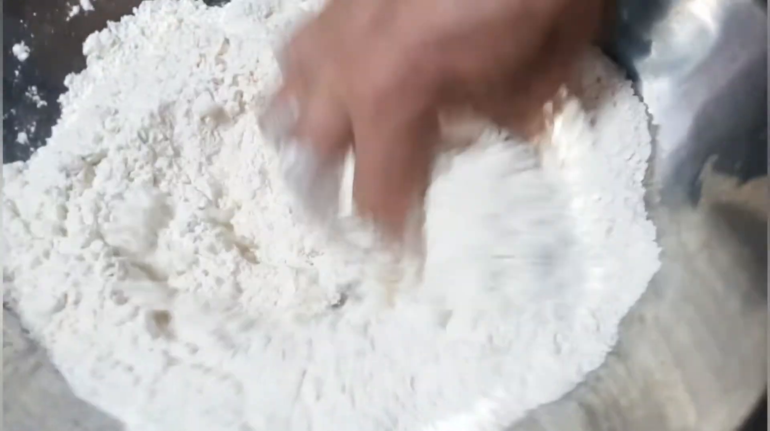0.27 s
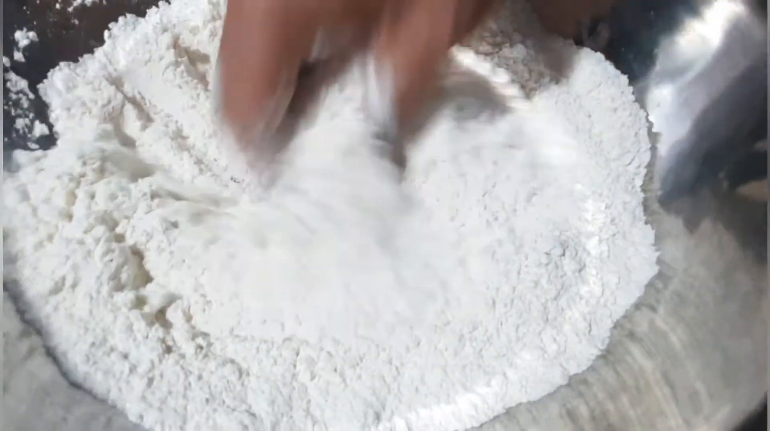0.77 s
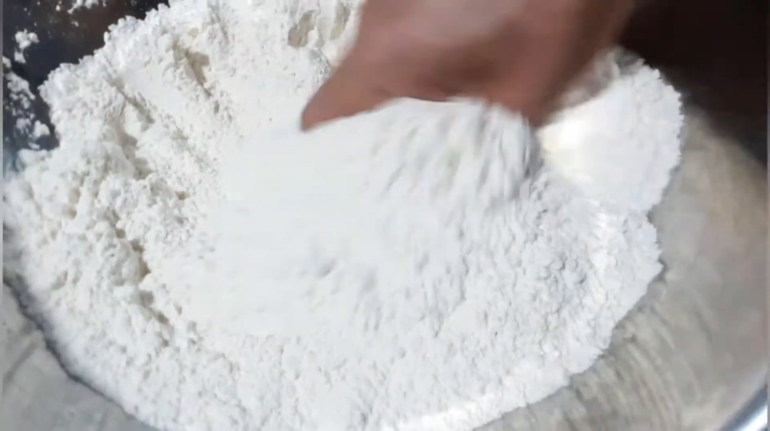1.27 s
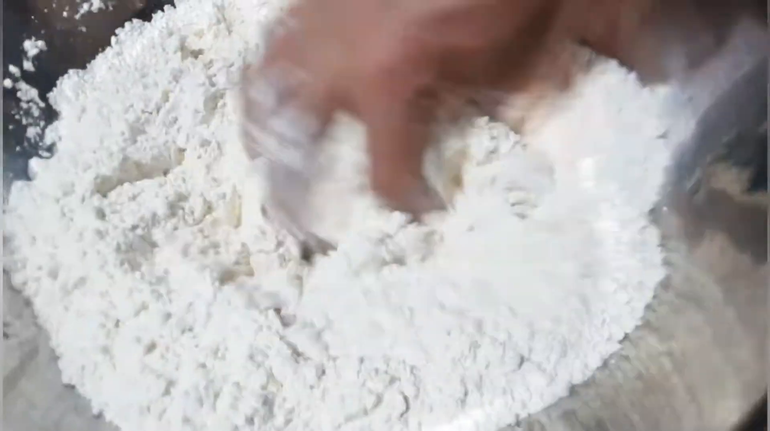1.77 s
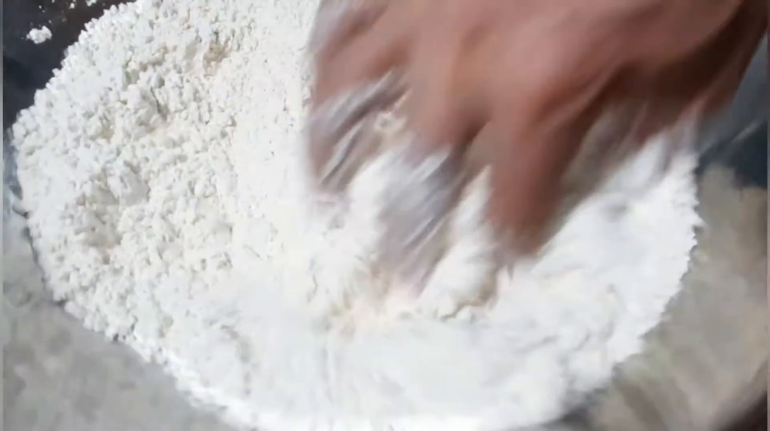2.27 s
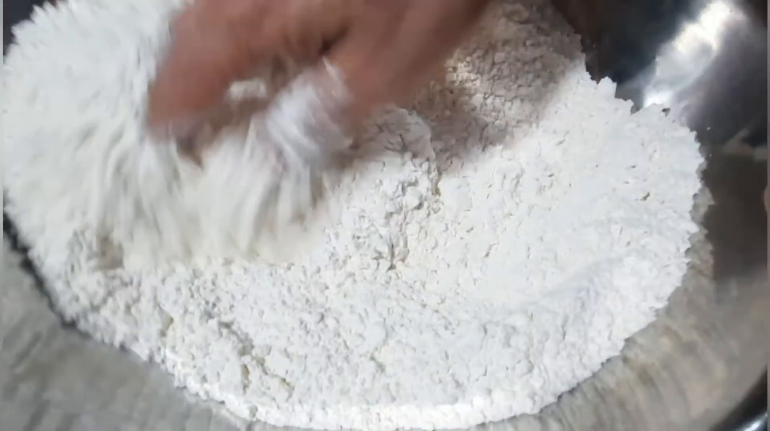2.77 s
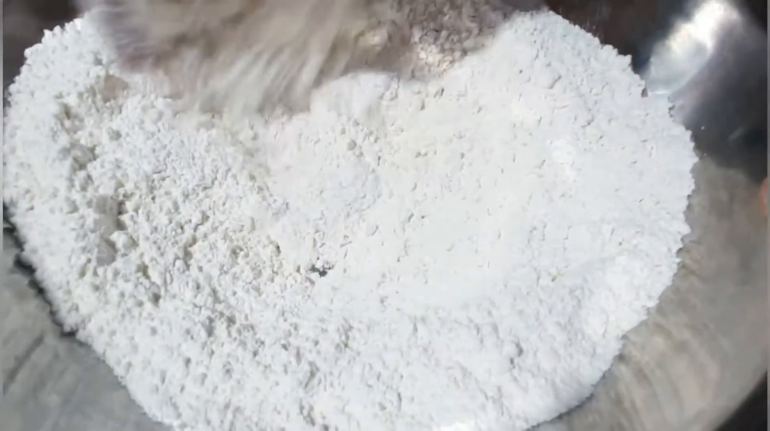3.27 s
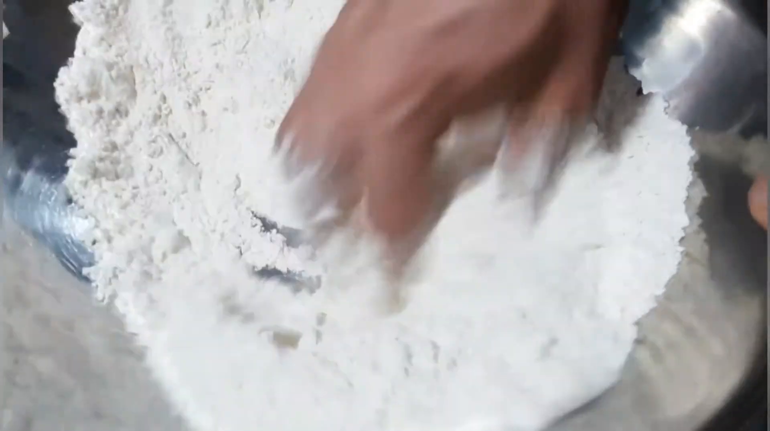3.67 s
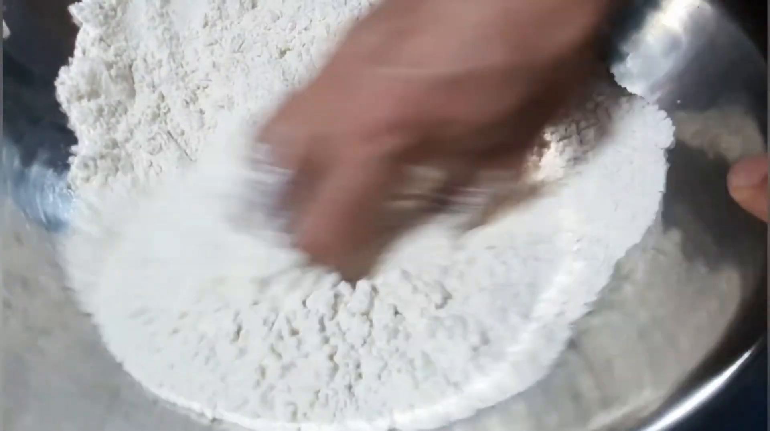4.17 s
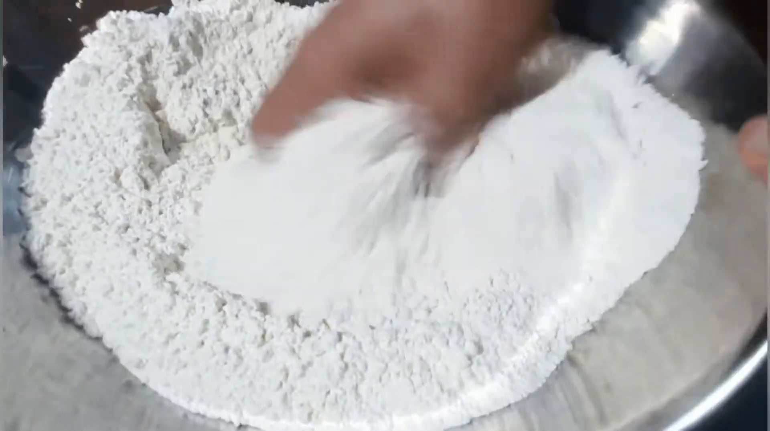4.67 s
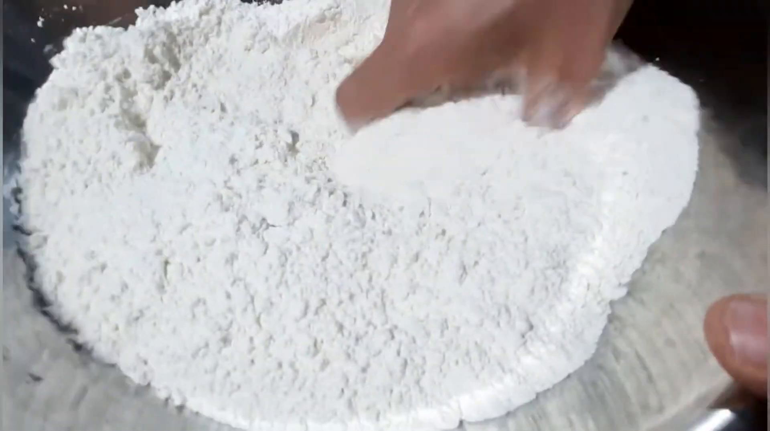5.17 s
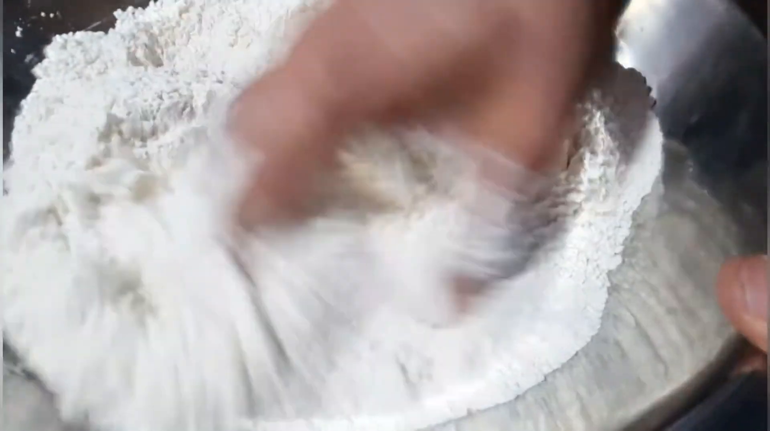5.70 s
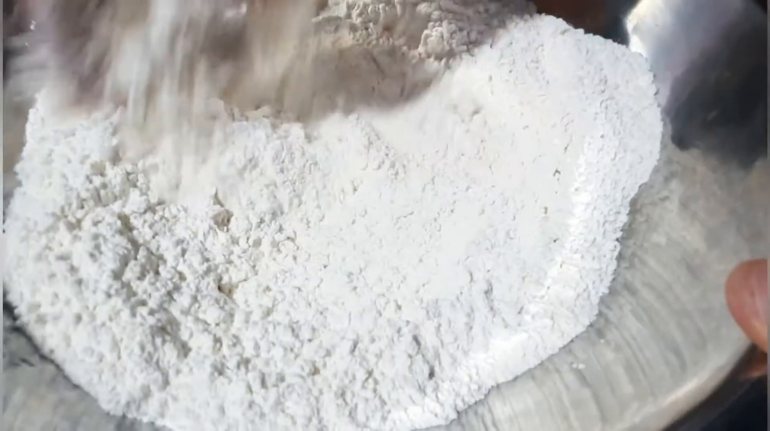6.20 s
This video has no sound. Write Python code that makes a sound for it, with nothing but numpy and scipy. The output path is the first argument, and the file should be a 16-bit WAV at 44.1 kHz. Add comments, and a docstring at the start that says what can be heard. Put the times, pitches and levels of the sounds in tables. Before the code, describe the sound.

A hand stirs dry flour in a steel bowl, with soft powdery hissing, rubbing and light thuds over a faint kitchen hum.

```python
"""Flour stirred in a steel bowl

A hand stirs dry flour close to the microphone. The shearing powder hisses, the fingers rub
the steel in stick-slip friction and tick against it, and handfuls drop back with soft thuds
that rock the bowl and ring its base. An appliance hums and hisses in the quiet kitchen behind."""
import sys
import numpy as np
from scipy import signal
from scipy.fft import rfft, irfft, next_fast_len
from scipy.io import wavfile

SR = 44100
rng = np.random.default_rng(int(sys.argv[2]) if len(sys.argv) > 2 else 0)


def store_wav(level_fs):
    """Save 16-bit WAV to argv[1]."""
    pcm = np.round(np.clip(np.atleast_2d(level_fs), -1, 1) * 32767)
    wavfile.write(sys.argv[1], SR, pcm.T.astype(np.int16))


N = 283959
T = np.arange(N) / SR

# spectrum of shearing powder: f/Hz, level/dB
POWDER_SPECTRUM = [(1500, -15), (3500, -38), (4500, -19.5), (5600, 3.5), (7000, -0.5), (8200, -1),
                   (9300, -10.5), (11500, -4.5), (13500, -4.5), (16000, -6)]
# spectrum of a soft push into the heap: f/Hz, level/dB
HEAP_SPECTRUM = [(18, -28), (35, -15.5), (55, -0.5), (80, -3.5), (125, -3.5), (170, -8.5), (260, -13.5),
                 (450, -20.5), (700, -19), (1500, -60)]
# modes of the base under the flour: f/Hz, bandwidth/Hz, gain/dB
BASE_MODES = [(246, 38, -32), (286, 7.2, -11), (313.6, 19, 6), (331.2, 28, 6.5), (340, 7.8, -10),
              (420.4, 7.5, 0.5), (460, 49, -10.5)]
# a finger presses through to the steel: firmest t/s, rise/s, fall/s, relative level/dB, hollow's f/Hz
FINGER_RUBS = [(0, .05, 0.1, -67.5, 1750), (0.204, 0.03, 0.027, -55.5, 2080),
               (0.268, .04, 0.075, -47.5, 2300), (.675, 0.22, .1, -61, 2040), (1.1, 0.13, 0.18, -63, 1440),
               (1.68, 0.039, 0.12, -59.5, 2400), (1.76, 0.14, 0.24, -61.5, 2400),
               (1.94, 0.17, 0.13, -73, 2000), (2.49, 0.029, 0.13, -67, 1250),
               (2.58, 0.15, 0.096, -60.5, 1730), (2.8, 0.087, .3, -64, 2160),
               (2.949, 0.079, 0.13, -54, 2130), (3.55, 0.17, 0.17, -62.5, 1980),
               (4.042, 0.04, 0.07, -58.5, 2250), (4.11, 0.15, 0.16, -57.5, 2060),
               (4.44, 0.037, 0.28, -66, 1110), (4.55, .1, 0.13, -56.5, 1990),
               (4.74, 0.28, 0.28, -67.5, 1710), (4.845, 0.044, 0.17, -55.5, 1540),
               (5.11, 0.17, 0.34, -57, 1510), (5.203, 0.041, 0.074, -45, 1180),
               (5.284, 0.15, 0.078, -49, 1700), (5.42, 0.064, 0.073, -67, 1790),
               (5.698, 0.039, 0.11, -62, 1750), (5.85, 0.14, 0.29, -64, 2080),
               (6.39, 0.12, .4, -60.5, 1420)]


def powder_flow():
    """Incoherent addition: the strokes sum to a flow amplitude and a power-weighted lump ratio."""
    # sweeps of the hand: full-speed t/s, rise/s, hold/s, fall/s, relative level/dB, lumps re powder/dB
    strokes = [(0, 0.11, 0, 0.097, -65.5, -11), (0.194, 0.14, 0.088, 0.22, -62, -13.5),
               (0.554, 0.043, 0.11, 0.16, -57.5, -12), (1.027, 0.081, 0.12, 0.72, -60, -9.5),
               (1.674, 0.13, 0.017, 0.96, -59.5, -19), (1.92, 0.059, 0.27, 0.38, -61, -8),
               (2.47, 0.15, 0.23, .3, -64, -13), (2.782, 0.095, 0.19, 0.22, -64, -16),
               (3.44, .1, 0.13, 0.43, -60, -12.5), (4.032, 0.082, 0.24, .2, -58, -13),
               (4.44, 0.092, 0.18, 0.27, -59.5, -10), (4.835, 0.087, 0.088, 0.14, -71.5, 2),
               (5.04, 0.088, .24, 0.18, -58, -7), (5.712, 0.035, 0.25, 0.18, -63.5, -13),
               (5.837, 0.48, 0.14, 0.15, -66.5, -9), (6.277, 0.08, 0.076, .2, -58.5, -14)]
    each = np.array([gain_of(db) * swell(s, rise, fall, hold) for s, rise, hold, fall, db, _ in strokes])
    lump_ratios = gain_of([row[-1] for row in strokes])
    flow = power_sum(each)
    return flow, lump_ratios @ each ** 2 / flow ** 2


def sliding_powder(flow, lumps):
    """Granular shear: dense slips merge into a hiss, bunched in small slumps; lumps add a rasp."""
    # flour pouring off the fingers: thickest t/s, rise/s, fall/s, relative level/dB
    spills = [(.27, .055, 0.071, -50), (1.06, 0.059, 0.076, -53.5), (2.939, 0.06, 0.15, -54),
              (3.265, 0.06, .07, -69.5), (4.43, 0.16, 0.091, -53), (4.54, 0.051, 0.041, -54.5),
              (5.058, 0.059, .11, -49), (5.85, 0.1, 0.019, -55.5), (6.315, .035, 0.22, -48.5)]
    fizz = unit_rms(colour(grains(per_s=20000, spread_db=-1.5), POWDER_SPECTRUM))
    coarse = ring(grains(per_s=6000, spread_db=3), [(4980, 700, 0)])
    rasp = unit_rms(ring(coarse, [(4670, 6900, 0)]))
    pours = [gain_of(db) * swell(s, rise, fall) for s, rise, fall, db in spills]
    slumps = gain_of(2.5 + 1.1 * wander(rate_hz=59))
    return (fizz + rasp * lumps) * slumps * power_sum([flow] + pours)


def hollow_pitch():
    """Cavity resonance: the hollow under the hand shrinks in each rub, so its pitch rises."""
    closing_oct_per_s = 0.99
    pitches = [hz * 2 ** (closing_oct_per_s * np.clip(T - s, -rise, fall))
               for s, rise, fall, _, hz in FINGER_RUBS]
    strengths = [gain_of(db) * swell(s, rise, fall) + 1e-9 for s, rise, fall, db, _ in FINGER_RUBS]
    return np.average(pitches, axis=0, weights=strengths) * np.exp(0.094 * wander(rate_hz=8.4))


def rubbing_fingers(flow, hollow_hz):
    """Stick-slip friction: skin drags flour over steel, filtered by the hollow and the finger gaps."""
    # spectrum of skin dragging over steel: f/Hz, level/dB
    skin_spectrum = [(150, -28), (400, -1.5), (700, 8.5), (1400, -2.5), (2600, -1), (3400, 0), (4200, -4),
                     (6000, 5.5), (10000, -13)]
    slips = colour(grains(per_s=5000, spread_db=2), skin_spectrum) * gain_of(1.23 * wander(rate_hz=38))
    cupped = unit_rms(moving_resonance(slips, hollow_hz, width_hz=5400))
    gaps = np.zeros((2, N))
    for _ in range(3):
        gap_hz = hollow_hz * np.exp(0.23 * wander(rate_hz=5.3))
        gaps += moving_resonance(slips, gap_hz, width_hz=260) * gain_of(3.4 * wander(rate_hz=15))
    combed = palm_echo(cupped + gain_of(-3.5) * unit_rms(gaps), hollow_hz)
    scrape = steel_wall(combed, ring_db=1.5)
    grazing = gain_of(-20.5) * flow  # skin touches the steel all through a stroke
    presses = [gain_of(db) * swell(s, rise, fall) for s, rise, fall, db, _ in FINGER_RUBS]
    return gain_of(2) * unit_rms(scrape) * power_sum([grazing] + presses)


def palm_echo(x, hollow_hz, palm_gain=0.28, wall_gain=0.52, wall_delay_s=0.0019):
    """Comb filtering: echoes from the palm and the bowl's wall interfere, cutting moving notches."""
    out = x.copy()
    for channel in range(len(x)):
        for delay, gain in ((1 / hollow_hz, palm_gain), (wall_delay_s, wall_gain)):
            drifting_delay = delay * np.exp(0.14 * wander(rate_hz=7.6))
            out[channel] += gain * np.interp(T - drifting_delay, T, x[channel])
    return out


def steel_wall(contact, ring_db):
    """Damped modes: the bowl's wall adds a short ring to the contact noise."""
    # wall modes, damped by flour and the holding hand: f/Hz, bandwidth/Hz, gain/dB
    wall_modes = [(878, 87, -2.5), (1387, 39, -8.5), (1741, 93, -3.5), (2425, 14, 2.5), (2794, 44, -4),
                  (3880, 40, -49), (3940, 160, 1), (4830, 50, 3)]
    return contact + gain_of(ring_db) * ring(contact, wall_modes)


def handful_thuds():
    """Inelastic impact: a handful and its ever weaker clumps rock the bowl and ring its base."""
    # landings: t/s, relative level/dB, time to fall 26 dB/s, relative gain of the base/dB
    landings = [(0.005, -46, 0.52, -8), (0.197, -32, 0.15, -2), (0.253, -35.5, 0.14, 6),
                (0.484, -41, 0.14, -25), (0.534, -38.5, 0.16, -7), (1.052, -33.5, 0.25, -29),
                (1.122, -38, 0.29, 9), (1.189, -36, 0.074, -21), (1.668, -35, 0.42, -1),
                (1.935, -45, 0.13, 0), (2.632, -50, 0.3, -12), (2.958, -30, 0.091, 0.5),
                (3.023, -35, 0.1, -28), (3.099, -47.5, 0.19, -19), (3.387, -44, 0.21, -14),
                (3.99, -28, 0.19, 0.5), (4.033, -35, 0.24, 3.5), (4.062, -39.5, .12, -12),
                (4.818, -25.5, 0.29, -2.5), (4.899, -36, 0.69, -1), (5.091, -26.5, 0.14, -15),
                (5.171, -39, 0.072, -13), (5.234, -41.5, .15, -19), (5.414, -43, 0.082, 8),
                (5.729, -39, 0.23, 10.5), (6.004, -46, 0.23, -12)]
    # the loaded bowl rocking in the holding hand: f/Hz, bandwidth/Hz, gain/dB
    rocking_modes = [(57, 14, -4), (74, 10, 0), (98, 16, 3), (122, 16, -1), (143, 14, -1)]
    out, t = np.zeros((2, N)), np.arange(SR // 2) / SR
    clumps_per_s = 500
    for s, db, length, base_db in landings:
        clumps = rng.standard_normal((2, len(t))) * (rng.random(len(t)) < clumps_per_s / SR)
        clumps[:, 0] = 1.17  # the handful itself
        push = colour(clumps * gain_of(-26 * t / length), HEAP_SPECTRUM)
        rocking = gain_of(5.5) * ring(push, rocking_modes)
        base = gain_of(base_db + 9) * ring(push, BASE_MODES)
        thud = push + rocking + base
        thud /= np.sqrt(np.sum(thud ** 2, axis=1, keepdims=True) / (length * SR))
        add(out, s, gain_of(db - 16) * thud)
    return out


def fingertip_ticks():
    """Impulsive excitation: a fingertip crunches flour on the steel and throws a spray of dust."""
    # taps on the steel: t/s, relative level/dB, relative gain of the dust/dB
    taps = [(0.11, -49.5, -8), (0.197, -35, 0.5), (0.237, -42, -4), (0.506, -48.5, -13), (1.022, -49, 19),
            (1.667, -46, -9), (2.478, -46, -7), (2.955, -36, -12), (3.404, -47, -14), (3.993, -37.5, -8),
            (4.035, -37.5, -17), (4.543, -46, -10), (4.738, -48, -16), (4.816, -32.5, -5),
            (4.834, -49, -11), (4.858, -34, -20), (4.921, -36.5, -24), (5.105, -37.5, -9),
            (5.205, -24.5, -14), (5.414, -43, -2), (5.746, -44, -1), (6.409, -42, -8)]
    out, t = np.zeros((2, N)), np.arange(SR // 8) / SR
    contact = np.exp(-t / 0.002) + 0.05 * np.exp(-t / 0.012)
    for s, db, dust_db in taps:
        crunch = rng.standard_normal((2, len(t))) * contact
        add(out, s, gain_of(db - 26.5) * (knock(crunch) + dust_spray(crunch, dust_db - 4)))
    return out


def knock(crunch):
    """Soft contact: a fingertip passes mostly low frequencies to the wall."""
    # spectrum of a fingertip's knock: f/Hz, level/dB
    knock_spectrum = [(200, 4), (600, -2.5), (1100, -1.5), (1800, 1), (3000, -10.5), (5000, -29),
                      (10000, -36)]
    return unit_rms(steel_wall(colour(crunch, knock_spectrum), ring_db=-5))


def dust_spray(crunch, db):
    """Granular noise: thrown dust carries the bright spectrum of powder."""
    return gain_of(db) * unit_rms(colour(crunch, POWDER_SPECTRUM))


def bursting_lumps(attack_s=0.0013):
    """Fracture: a lump gives way in one quick burst of powder noise."""
    # bursts: t/s, relative peak level/dB, time to fall 40 dB/s
    bursts = [(0.535, -45, .06), (1.049, -37.5, 0.13), (2.945, -39, 0.021), (3, -49, 0.033),
              (4.959, -40.5, 0.022), (5.012, -41, 0.035), (5.688, -48, 0.028)]
    out, t = np.zeros((2, N)), np.arange(SR // 6) / SR
    for s, db, length in bursts:
        envelope = gain_of(-40 * t / length) * np.minimum(t / attack_s, 1)
        burst = colour(rng.standard_normal((2, len(t))) * envelope, POWDER_SPECTRUM)
        add(out, s, gain_of(db + 4.5) * burst / abs(burst).max())
    return out


def air_pockets(attack_s=0.00057):
    """Cavity resonance: rubbing noise rings the air in the cupped hand, fading as the fingers part."""
    # pockets of enclosed air: t/s, decay time/s, f/Hz, level/dB
    pockets = [(0.977, 0.054, 980, -68), (1.017, 0.093, 930, -55), (2.47, 0.034, 1210, -59.5),
               (2.763, 0.085, 970, -67), (4.391, 0.16, 990, -63.5), (4.533, 0.021, 900, -54.5),
               (4.716, 0.067, 760, -58), (5.183, 0.044, 955, -50), (5.202, .02, 1230, -54)]
    out, t = np.zeros((2, N)), np.arange(SR // 3) / SR
    for s, length, hz, db in pockets:
        friction = rng.standard_normal((2, len(t)))
        cupped = ring(ring(friction, [(hz, 120, 0)]), [(hz, 480, 0)])
        envelope = (1 - np.exp(-t / attack_s)) * np.exp(-(t / length) ** 2)
        add(out, s, gain_of(db) * unit_rms(cupped) * envelope)
    return out


def base_murmur():
    """Forced vibration: the moving heap keeps the modes of the bowl's base sounding."""
    # the murmur follows how hard the hand leans into the heap: t/s, level/dB
    lean = [(0, -63), (.25, -52), (.45, -70), (.66, -54.5), (.85, -62.5), (1.3, -53.5), (1.85, -59),
            (2.5, -68), (2.95, -64), (3.2, -61.5), (3.85, -57), (4.3, -55.5), (4.95, -51), (5.6, -58.5),
            (5.78, -56), (6.15, -56), (6.4, -51)]
    shove = colour(grains(per_s=900, spread_db=0.7), HEAP_SPECTRUM)
    return unit_rms(ring(shove, BASE_MODES)) * gain_of(np.interp(T, *np.transpose(lean)))


def reverberation(x, t60_s):
    """Diffuse reflection: the near walls return an exponentially decaying tail after 4 ms."""
    t = np.arange(SR // 2) / SR
    tail = rng.standard_normal((2, len(t))) * gain_of(-60 * t / t60_s) * (t > 0.004)
    return signal.oaconvolve(x, tail / np.linalg.norm(tail[0]), axes=1)[:, :N]


def kitchen():
    """Superposition: an appliance's wavering tones, room noise, a narrow hiss and a thin whine."""
    # tones of the hum: f/Hz, rms level/dB
    hum_tones = [(118.4, -71), (248, -74), (329, -68), (411.5, -69), (468.3, -77), (529.5, -72),
                 (705.2, -80), (823.6, -88), (1766, -94)]
    # spectrum of the room noise: f/Hz, level/dB
    air_spectrum = [(20, -19), (60, -12.5), (130, -11), (190, 1.5), (310, 3), (440, -6), (650, -6.5),
                    (1000, -21.5), (1900, -24), (2600, -25.5), (4500, -38.5), (7500, -22), (9500, -35),
                    (12000, -26.5), (16000, -45)]
    # spectrum of the narrow hiss: f/Hz, level/dB
    hiss_spectrum = [(4300, -38.5), (5200, -12), (5650, 0.5), (5950, 8.5), (6200, 9), (6450, 0.5),
                     (6800, -25), (8000, -54)]
    hum = np.zeros((2, N))
    for hz, db in hum_tones:
        phase = 2 * np.pi * (hz * T + rng.random()) + 1.14 * wander(rate_hz=7.2)
        amplitude = np.sqrt(2) * gain_of(db + 1.77 * wander(rate_hz=11))
        hum += amplitude * np.array([np.sin(phase), np.cos(phase)])
    air = gain_of(-67) * unit_rms(colour(rng.standard_normal((2, N)), air_spectrum))
    hiss = gain_of(-62.5) * unit_rms(colour(rng.standard_normal((2, N)), hiss_spectrum))
    whine = gain_of(-82) * unit_rms(ring(rng.standard_normal((2, N)), [(3252, 28, 0)]))
    return hum + air + hiss * gain_of(wander(rate_hz=22)) + whine


def microphone_pair(x, balance):
    """Spatial coherence: two ports hear alike in the bass, unrelated in the treble, at unequal levels."""
    # likeness of left and right: f/Hz, correlation (0 to 1)
    correlation = [(60, 1), (130, 0.92), (290, 0.96), (640, 0), (1400, 0.16), (3000, 0), (16000, 0)]
    size = next_fast_len(N + 4096)
    hz = np.fft.rfftfreq(size, 1 / SR)
    left, independent = rfft(x, size)
    alike = np.clip(curve_at(correlation, hz), -1, 1)
    right = alike * left + np.sqrt(1 - alike ** 2) * independent
    tilt = gain_of(curve_at(balance, hz) / 2)
    return irfft(np.array([left * tilt, right / tilt]), size)[:, :N]


def grains(per_s, spread_db):
    """Shot noise: tiny slips of uneven size come at random and reach each channel by their own paths."""
    sizes = gain_of(spread_db * np.minimum(rng.exponential(1, N), 4.5))
    slipping = rng.random(N) < per_s / SR
    return sizes * slipping * rng.standard_normal((2, N))


def swell(s, rise, fall, hold=0):
    """Exponential envelope: 1 at time s, with 20 dB of change per rise and, after the hold, per fall."""
    t = T - s
    sag_db = -19 * np.clip(t, 0, hold)  # a stroke weakens as flour runs off the fingers
    flanks = np.maximum(-t / rise, (t - hold) / fall)
    return gain_of(sag_db - 20 * np.maximum(flanks, 0))


def wander(rate_hz):
    """Random modulation: noise of rms 1, low-passed at rate_hz."""
    knots = np.arange(0, 8, 1 / 1000)
    hz = np.fft.rfftfreq(len(knots), knots[1])
    slow = irfft(rfft(rng.standard_normal(len(knots))) / (1 + (hz / rate_hz) ** 4))
    return unit_rms(np.interp(T, knots, slow))


def ring(x, modes):
    """Modal superposition: parallel resonators, each given as f/Hz, bandwidth/Hz, gain/dB."""
    return sum(gain_of(db) * signal.lfilter(*signal.iirpeak(hz, hz / width, SR), x)
               for hz, width, db in modes)


def moving_resonance(x, hz, width_hz):
    """Heterodyning: shifting down, low-passing and shifting back gives a resonance that follows hz."""
    carrier = np.exp(2j * np.pi * np.cumsum(hz) / SR)
    pole = np.exp(-np.pi * width_hz / SR)
    return 2 * (carrier * signal.lfilter([1 - pole], [1, -pole], x / carrier)).real


def colour(x, spectrum, size=4096):
    """Minimum-phase filtering: imposes a spectrum causally, so attacks stay sharp."""
    log_gain = np.log(gain_of(curve_at(spectrum, abs(np.fft.fftfreq(size, 1 / SR)))))
    taps = np.fft.ifft(np.exp(np.conj(signal.hilbert(log_gain)))).real[:size // 2]
    return signal.oaconvolve(x, taps[None], axes=1)[:, :x.shape[1]]


def curve_at(points, hz):
    """Interpolation on a log-frequency axis."""
    f, value = np.transpose(points)
    return np.interp(np.log(hz + 1), np.log(f), value)


def add(mix, s, sound):
    """Superposition of a stereo sound at time s."""
    part = mix[:, max(round(s * SR), 0):][:, :sound.shape[1]]
    part += sound[:, :part.shape[1]]


def power_sum(gains):
    """Incoherent sounds add in power."""
    return np.sqrt(sum(g ** 2 for g in gains))


def gain_of(db):
    """Decibels to amplitude."""
    return 10 ** (np.asarray(db) / 20)


def unit_rms(x):
    """Normalisation to rms 1."""
    return x / np.sqrt(np.mean(x ** 2) + 1e-20)


def scene():
    """Direct and diffuse sound: the bowl, a little to the left, in its kitchen."""
    # balance of the bowl: f/Hz, left minus right level/dB
    bowl_balance = [(60, 1.5), (130, 2), (300, -2), (600, 0.5), (1200, 5), (2400, 5), (4500, 7.5),
                    (6000, 1.5), (8000, 8), (10500, 11.5), (13000, 10), (16000, -6)]
    # balance of the background: f/Hz, left minus right level/dB
    kitchen_balance = [(60, 14.5), (200, -7.5), (380, -5), (700, -4.5), (1300, 1), (2400, 1.5), (4400, 4),
                       (8000, -4.5), (15000, 4)]
    flow, lumps = powder_flow()
    hollow_hz = hollow_pitch()
    bowl = sliding_powder(flow, lumps) + rubbing_fingers(flow, hollow_hz) + base_murmur()
    bowl += handful_thuds() + fingertip_ticks() + bursting_lumps() + air_pockets()
    bowl += gain_of(-9.5) * reverberation(bowl, t60_s=0.079)
    return microphone_pair(bowl, bowl_balance) + microphone_pair(kitchen(), kitchen_balance)


def record(dry):
    """Band limiting: a linear-phase low-pass removes the highest treble."""
    cutoff_hz = 15900
    taps = signal.firwin(511, cutoff_hz, window=("kaiser", 9), fs=SR)
    return signal.oaconvolve(dry, taps[None], "same")


dry = scene()
out = record(dry)
store_wav(out)
```